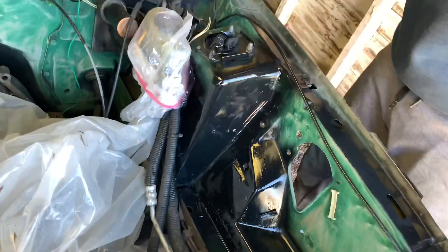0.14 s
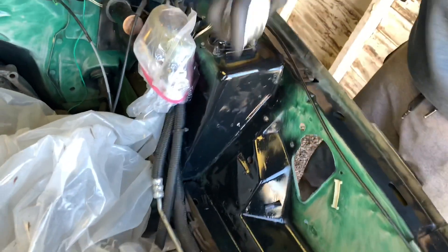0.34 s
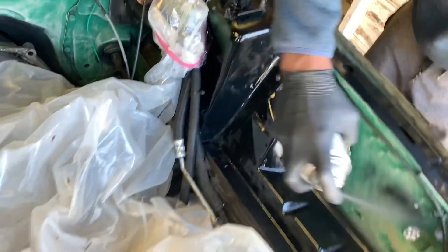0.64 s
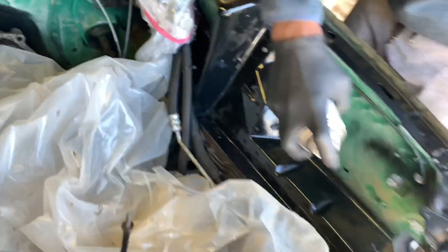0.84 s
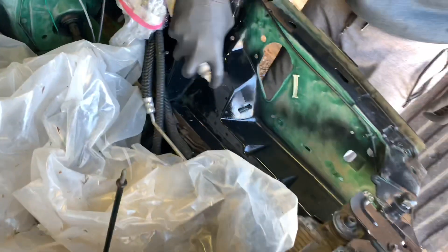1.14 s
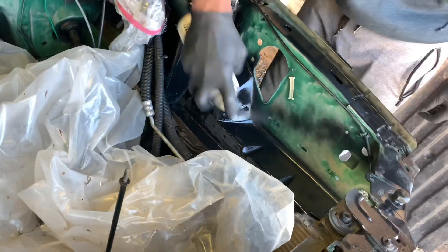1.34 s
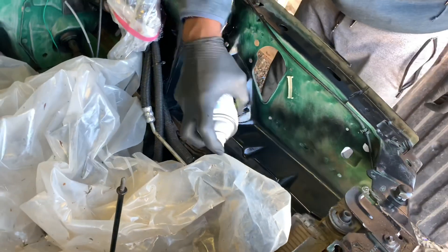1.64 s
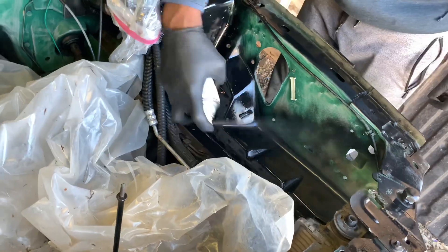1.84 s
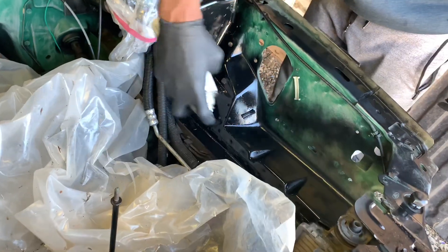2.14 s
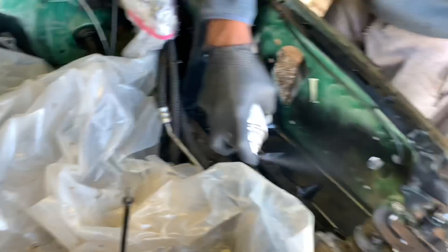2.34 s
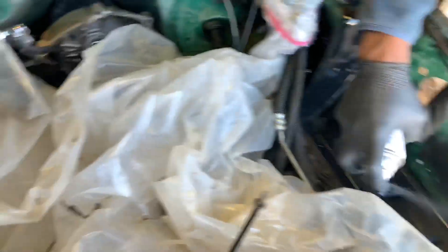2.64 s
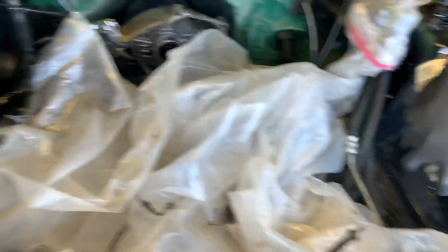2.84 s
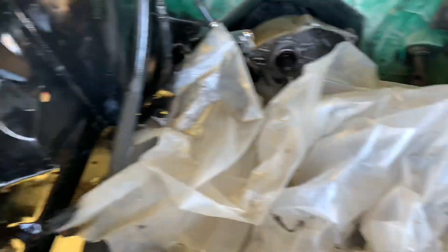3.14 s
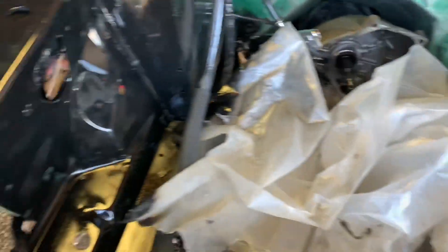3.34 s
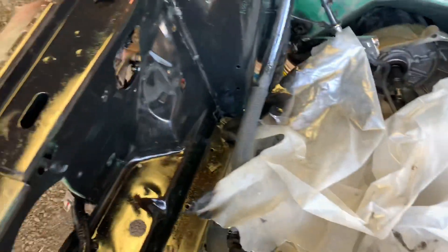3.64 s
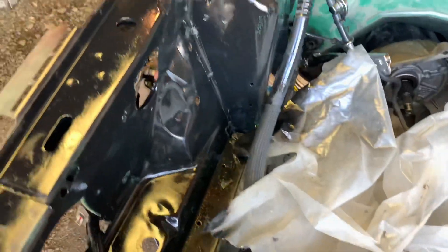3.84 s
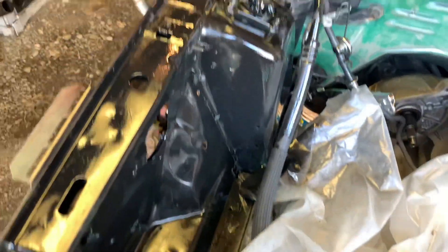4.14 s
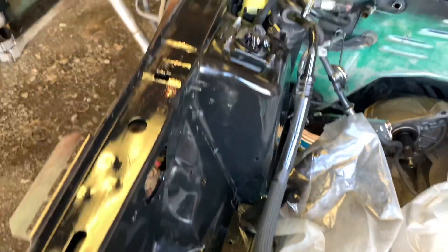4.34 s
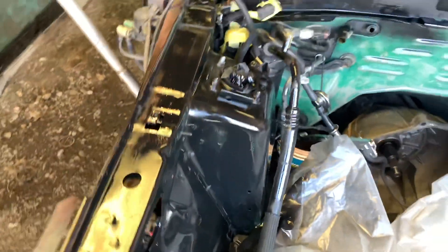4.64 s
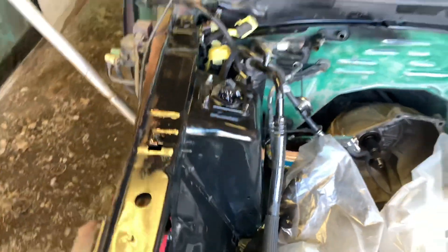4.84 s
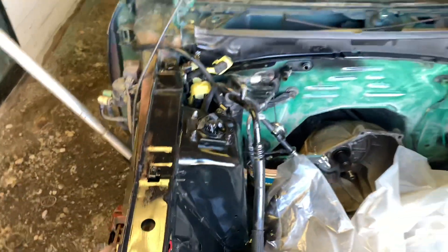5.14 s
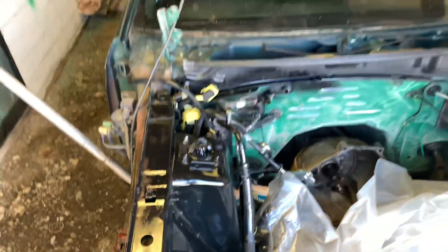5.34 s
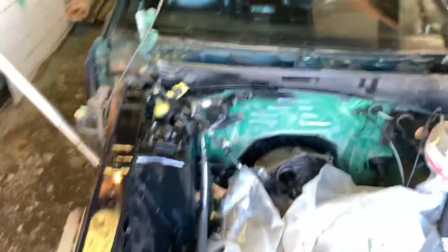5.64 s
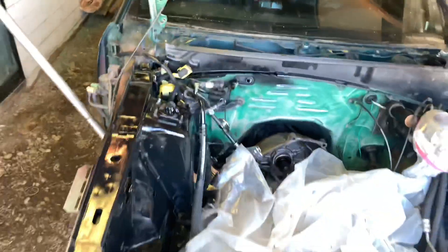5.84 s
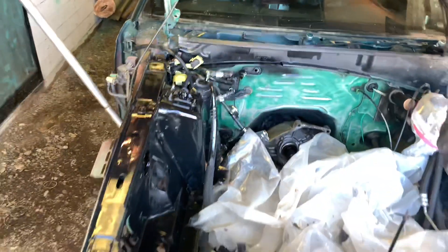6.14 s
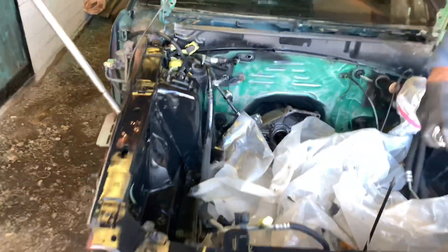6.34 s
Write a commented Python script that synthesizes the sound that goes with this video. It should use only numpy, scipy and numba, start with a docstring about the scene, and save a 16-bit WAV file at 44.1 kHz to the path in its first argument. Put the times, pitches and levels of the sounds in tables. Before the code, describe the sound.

A paint can's ball clatters and a glove rustles, then crisp airy sprays follow one another, each a quarter second long and abruptly shut off. Hard clicks in the can and muffled sheet-metal knocks fall around them. Many presses begin with a tiny squeak and spit; the final one is cut off. A faint low motor and rumble lie beneath, picked up closely by a moving phone in a garage.

```python
"""From the dying tail of one press on, a spray can fires short presses over sheet metal in a garage.
Rattles and a rustle come first; from 0.5 s noise jets hiss, a wide plume around them; knocks cluster near 1 s.
From 1.3 s most presses start with a rising noise squeak, many with a spit; late on, rustle; the last press is cut.
Mixing ball and bodywork are rough noise contacts ringing band-pass modes; noise tails make the room.
Throughout, a wavering motor sine and rumble lie below; a hand-held phone swings past, so the side lag drifts."""
import sys
import numpy as np
from scipy import signal
from scipy.fft import rfft, irfft
from scipy.io import wavfile
from scipy.ndimage import uniform_filter1d, map_coordinates
from numba import njit

SR = 44100
rng = np.random.default_rng(int(sys.argv[2]) if len(sys.argv) > 2 else 0)


def waveform_to_disk(signal):
    """Save audio, clipped to [-1, 1], as 16-bit WAV at the path in sys.argv[1]."""
    frames = np.transpose(np.atleast_2d(signal))
    scaled = np.clip(frames, -1, 1) * 32767
    samples = np.round(scaled).astype(np.int16)
    wavfile.write(sys.argv[1], SR, samples)


N = 286375
TIME_S = np.arange(N) / SR

# presses: open_s, length_s, jet_db, first_rush_over_jet_db, sag_over_press_db, lower_hiss_over_jet_db,
# shut_db_per_s, crack_lead_s, squeak_db, spit_peak_db; None = no such sound
PRESSES = [(-.2, 0.2, -49, -4, -0.5, -4, 400, None, None, None),
           (0.524, 0.21, -39, 6, 1, -12, 750, None, None, None),
           (0.852, 0.26, -42, 9.5, -5, -10.5, 650, None, None, None),
           (1.276, 0.27, -34, -5, 6, -13, 790, 0.023, -42, None),
           (1.677, 0.29, -36.5, 2.4, 4.5, -13.5, 750, None, None, None),
           (2.138, 0.27, -39.5, 5, -2, -14, 800, 0.047, -40, -45.5),
           (2.596, 0.28, -38, 6, 5, -14, 748, 0.045, -35, -41),
           (3.043, 0.34, -40, 2, 3, -13, 600, 0.036, -37.5, -44),
           (3.695, 0.34, -44.5, 7, -1.5, -14, 597, 0.046, -47, -48.5),
           (4.293, 0.24, -42, 1, 4.5, -14, 650, 0.045, -45.5, -57.5),
           (4.647, 0.21, -44, 2, -2, -12.5, 549, 0.051, -58, None),
           (5.032, 0.29, -43.5, -1.5, 6.5, -9.5, 494, None, None, None),
           (5.509, 0.26, -44.5, 6.5, -3.5, -14, 392, 0.043, -42, -47),
           (6.008, 0.22, -37, -16, 3.5, -12.5, 448, .029, -38, -42),
           (6.438, 0.079, -45.5, -11, -7, -10, 600, 0.022, -46, -46.5)]
# jet hiss spectrum: freq_hz, density_db
JET_SPECTRUM = [(4500, -34), (6500, -6.5), (8500, -5), (10500, 0), (13000, 1), (16000, -9)]
# lower hiss spectrum: freq_hz, density_db
LOWER_SPECTRUM = [(500, 2), (1000, -4.5), (2100, 2), (2600, 6.5), (3100, 1), (4500, 6), (6500, 1),
                  (9000, -39)]
# mixing ball blows on the can wall: time_s, base_level_db, dull_modes_over_base_db, bright_modes_over_base_db
BALL_BLOWS = [(0.086, -52, 3, -12), (0.1973, -21.5, -10.5, -29), (0.2741, -42.5, 2.5, 2),
              (0.328, -45, 3, 0), (0.3606, -46.5, -1.5, 0), (0.379, -50, 1, -1), (0.391, -57, 3, -4),
              (0.7722, -30, -7.5, 7.5), (1.5503, -33.5, -8, 10.5), (1.614, -53, 7, 14.5),
              (1.6364, -40.5, -10, 7), (1.7928, -39, -8.5, -17), (2.088, -42.5, -49, -27),
              (2.2203, -31, -14.5, -13), (3.1027, -25.5, -47, -20), (3.192, -36, -30, -22),
              (3.4367, -36.5, -8.5, 8.5), (3.4882, -35.5, -41, 4), (3.548, -44, -6, -1),
              (4.9485, -43.5, -8, 7.5), (5.8714, -47.5, -30, -1), (5.959, -53, -17, 2), (6.288, -50, -2, 3)]
# can wall modes: centre_hz, width_hz, level_db
CAN_MODES = [(1090, 570, -5), (1680, 820, 7), (2610, 650, -1.5), (3850, 540, 0), (6700, 2600, 2),
             (11050, 11300, 2)]
# knocks on the bodywork: time_s, base_level_db, deep_modes_over_base_db, contact_s
KNOCKS = [(0.945, -40.5, -15, 0.011), (0.959, -41.5, 1, 0.0074), (0.979, -41.5, -2.5, 0.0062),
          (0.994, -43, -4, 0.011), (1.028, -32.5, -26, 0.011), (1.042, -28.5, -9, 0.0054),
          (1.066, -42, -19, 0.018), (1.105, -36.5, -3, 0.0064), (1.1152, -25, -14, 0.0011),
          (1.134, -42, -10, 0.023), (1.198, -47, -17, 0.0066), (1.223, -42.5, -10, .008),
          (1.24, -40, -12, 0.0063), (4.399, -42.5, -11.5, 0.0042), (4.841, -38, -8, 0.0064),
          (5.522, -45.5, -5, 0.0082), (6.109, -35.5, -14, .003), (6.179, -37.5, -6.5, 0.0029)]
# bodywork panel modes: centre_hz, width_hz, level_db
PANEL_MODES = [(198, 290, 6), (375, 203, -2), (646, 490, 8), (935, 210, -5.5), (1290, 220, 1.5),
               (1543, 116, -5), (1900, 490, -18)]
# glove and plastic sheet stirs: loudest_s, level_db, fade_db_per_s
STIRS = [(0, -52, 181), (.15, -61.5, 32), (1.03, -53.5, 110), (4.999, -58, 195), (5.642, -58, 189),
         (5.84, -65.5, 204), (6.141, -46.5, 179)]
# folding sheet spectrum: freq_hz, density_db
SHEET_SPECTRUM = [(400, 1), (900, -2.5), (1600, 4), (4000, -5), (16000, -13.5)]
# distant motor level: time_s, peak_db before waver
MOTOR_LEVEL = [(0.0, -43), (0.9, -37), (1.35, -48.5), (1.75, -46.5), (2.0, -56), (2.5, -50), (3.4, -60.5),
               (3.75, -49), (4.7, -57.5), (6.05, -72.5), (6.378, -39.5), (6.49, -53)]
# garage rumble level: time_s, level_db before waver
RUMBLE_LEVEL = [(0, -54.5), (1.2, -53), (2.7, -55), (4.2, -56.5), (5.6, -55), (6.3, -51.5)]
# garage rumble spectrum: freq_hz, density_db
RUMBLE_SPECTRUM = [(28, -50), (42, 2), (120, -1), (200, -6.5), (400, -15.5), (700, -30), (1900, -39),
                   (4000, -43.5), (16000, -55)]
# low puffs, probably air on the moving phone: centre_s, level_db, half_length_s
GUSTS = [(0.634, -50, 0.044), (2.803, -52, 0.078), (3.89, -57, 0.14), (5.523, -51, 0.014)]
# can bearing as the phone turns: time_s, left_lags_right_ms
BEARING = [(.6, 0.1), (1.1, -0.052), (2.3, -0.0245), (2.75, 0.2), (3.2, 0.35), (3.8, 0.37), (4.7, 0.349),
           (5.6, 0.26), (6.49, 0.2)]

OPEN_DB_PER_S = 1377
LOWER_RUSH_DB, RUSH_S = 4., 0.017  # extra lower hiss in the first rush; settling time of the rush
EASE_DB, EASE_S = 8.5, 0.011  # finger eases off before it lets go
SPIT_SHARE = 0.54  # spit precedes full flow by this share of the crack lead
TICK_GAIN, TICK_AT_DB, TICK_DB_PER_DB = 3.8, -46, 0.37  # by base level less bright part: hard, square blows tick more
RUSTLE_RISE_DB_PER_S, CRACKLE_AT_DB = 172, -56  # stirs above the latter crackle more than they rustle
MOTOR_HZ, MOTOR_SAG_HZ_PER_S = 78.8, .8
ROOM_T60_S, BRIGHT_T60_S, ROOM_DB = .24, .14, -5
PORTS_MS, PORTS_HZ, TREBLE_SHARED = .297, 8800, .82  # left lag; where sharing sets in; share up there
TOP_HZ = 16100


def spray(spread=0.64):
    """Turbulent nozzle jet plus a stem-coloured lower hiss; returns nozzle and two-sided plume on the metal."""
    jet, lower, sputter = np.zeros((3, N))
    for open_s, length_s, jet_db, rush_db, sag_db, lower_db, shut_db_per_s, *_ in PRESSES:
        close_s = open_s + length_s
        since_s = np.maximum(TIME_S - open_s, 0)
        left_s = np.maximum(close_s - TIME_S, 0)
        opening_db = -OPEN_DB_PER_S * np.maximum(open_s - TIME_S, 0)
        closing_db = -shut_db_per_s * np.maximum(TIME_S - close_s, 0)
        rush = np.exp(-since_s / RUSH_S)
        ease = np.exp(-left_s / EASE_S)
        sag = np.minimum(since_s / length_s, 1)
        flow_db = jet_db - sag_db * sag + rush_db * rush + opening_db + closing_db
        jet += undb(flow_db - EASE_DB * ease)
        lower += undb(flow_db + lower_db + LOWER_RUSH_DB * rush)
        sputter += np.exp(-since_s / 0.04) * (TIME_S > open_s)
    # droplets leave unevenly, most so just after opening
    flutter = undb(1.83 * walk(60) + (.8 + sputter) * walk(2500))
    swings_db = [3.2 * walk(11) for _ in range(6)]
    hisses = []
    for _ in range(3):  # nozzle, plume left, plume right
        jet_hiss = jet * flutter * coloured(JET_SPECTRUM, 8100, 14600)
        lower_hiss = lower * flutter * patchy(coloured(LOWER_SPECTRUM, 1000, 9100), swings_db)
        hisses.append(jet_hiss + lower_hiss)
    return hisses[0], spread * np.array(hisses[1:])


def patchy(hiss, swings_db):
    """Bands of the hiss swell and fade independently as the spray cone wanders."""
    centres_hz = 1800 * 1.35 ** np.arange(len(swings_db))
    return hiss + sum((undb(db) - 1) * band(hiss, hz, hz / 4) for hz, db in zip(centres_hz, swings_db))


def valve():
    """Gas squeaks upward through the widening gap and leaks on; then a spit rings the stem."""
    out = np.zeros(N)
    t_s = np.arange(int(.04 * SR)) / SR
    squeak_hz = 8000 + 170000 * np.minimum(t_s, .016)
    rise, fade = np.minimum(t_s / 0.016, 1), np.exp(-(t_s / .016) ** 4)
    for open_s, *_, lead_s, squeak_db, spit_db in PRESSES:
        gas = rng.standard_normal(len(t_s))
        spit = burst(0.05, 0.00045, 0.0097)
        if squeak_db is not None:
            squeak = sum(svf(svf(gas, k * squeak_hz, 2400.), k * squeak_hz, 2400.) for k in (1, 1.4))
            leak = 0.5 * band(gas, 11400, 9600) * t_s / t_s[-1]
            add(out, open_s - lead_s, undb(squeak_db) * (squeak * fade + leak) * rise)
        if spit_db is not None:
            stem = band(band(spit, 3140, 1100), 2640, 1400)
            add(out, open_s - SPIT_SHARE * lead_s, peak(stem, spit_db))
    return out


def ball():
    """A tick and a skid of a few ms along the wall ring the can's damped modes."""
    out = np.zeros(N)
    for time_s, base_db, dull_db, bright_db in BALL_BLOWS:
        contact = burst(0.026, 0.0021, 0.0041) + 0.035 * burst(0.14, 0.0034)
        contact[40] += TICK_GAIN * undb(TICK_DB_PER_DB * (base_db - bright_db - TICK_AT_DB))
        # grip and paint level move the modes from blow to blow
        shifts = 1 + .05 * rng.standard_normal(len(CAN_MODES))
        for (hz, width_hz, mode_db), shift in zip(CAN_MODES, shifts):
            part_db = dull_db if hz < 2000 else bright_db if hz > 7000 else 0
            mode = ring(contact, hz * shift, width_hz)
            add(out, time_s - .001, peak(mode, base_db + mode_db + part_db))  # tick is 0.9 ms in
    return out


def knocks():
    """A rough, stuttering contact rings the panel; where it lands sets the share of each mode."""
    out = np.zeros(N)
    for time_s, base_db, deep_db, contact_s in KNOCKS:
        blow = burst(0.018 + 3 * contact_s, contact_s / 5, contact_s / 2)
        blow *= undb(4 * np.repeat(rng.standard_normal(len(blow) // 45), 45))  # stutters about every ms
        places_db = 1.5 * rng.standard_normal(len(PANEL_MODES))
        panel = np.zeros(len(blow))
        for (hz, width_hz, mode_db), place_db in zip(PANEL_MODES, places_db):
            part_db = deep_db * (hz < 900)
            panel += peak(ring(blow, hz, width_hz), mode_db + place_db + part_db)
        add(out, time_s, undb(base_db) * panel)
    return out


def rustle():
    """Folding-sheet noise: each stir swells quickly, fades at its own pace; hard ones crackle brightly."""
    gain = np.zeros(N)
    for loudest_s, level_db, fade_db_per_s in STIRS:
        rise_db = -RUSTLE_RISE_DB_PER_S * np.maximum(loudest_s - TIME_S, 0)
        fade_db = -fade_db_per_s * np.maximum(TIME_S - loudest_s, 0)
        gain += undb(level_db + rise_db + fade_db)
    hardness = gain / undb(CRACKLE_AT_DB)
    crackle = hardness * undb(6.3 * walk(700)) * band(rng.standard_normal(N), 3800, 2600)
    return gain * undb(3.3 * walk(150)) * (coloured(SHEET_SPECTRUM, 900, 3000) + crackle)


def garage_air():
    """A wavering, slowly sagging motor sine, noise rumble and soft gusts; the bass is nearly alike on both sides."""
    motor_hz = (MOTOR_HZ - MOTOR_SAG_HZ_PER_S * TIME_S) * (1 + .015 * walk(10))
    turns = np.cumsum(motor_hz) / SR
    motor_db = follow(MOTOR_LEVEL) + 1.04 * walk(9.9)
    motor = undb(motor_db) * np.sin(2 * np.pi * turns)

    mid, side = coloured(RUMBLE_SPECTRUM, 105.8, 274), coloured(RUMBLE_SPECTRUM, 116, 165)
    highpass = signal.butter(1, 900, "high", fs=SR, output="sos")
    side = 0.1 * side + 0.59 * signal.sosfilt(highpass, side)
    sides = np.array([[1], [-1]])  # left, right
    rumble = undb(follow(RUMBLE_LEVEL) + 1.8 * walk(9)) * (mid + sides * side)

    gust_spectrum = [(120, -55.0), (200, -12.0), (450, -14.0), (900, -36.0)]  # freq_hz, density_db
    gust_mid, gust_side = (coloured(gust_spectrum) for _ in range(2))
    swell = sum(undb(db) * np.exp(-((TIME_S - centre_s) / half_s) ** 2) for centre_s, db, half_s in GUSTS)
    gusts = swell * undb(2.5 * walk(30)) * (gust_mid + .4 * sides * gust_side)
    return (motor + rumble) * (1 - 0.046 * sides) + gusts


def room(dry):
    """Decaying noise tails, another for each side, duller as they fade."""
    t_s = np.arange(int(.4 * SR)) / SR
    tails = rng.standard_normal((2, len(t_s))) * undb(-60 * t_s / ROOM_T60_S) * (t_s > .002)
    bright = np.array([band(noise, 1950, 8600) for noise in rng.standard_normal((2, len(t_s)))])
    tails += 11.2 * bright * undb(-60 * t_s / BRIGHT_T60_S)
    tails *= undb(ROOM_DB) / np.sqrt(np.sum(tails[0] ** 2))
    return signal.fftconvolve(dry[None], tails)[:, :N]


def undb(db):
    """dB to gain."""
    return 10 ** (np.asarray(db) / 20)


def follow(table):
    """Interpolates a time_s, value table over the scene."""
    return np.interp(TIME_S, *np.transpose(table))


def coloured(spectrum, lo_hz=20, hi_hz=20000):
    """Gaussian noise with the given spectrum, rms 1 between lo_hz and hi_hz."""
    hz = np.maximum(np.fft.rfftfreq(N, 1 / SR), 1)
    at_hz, db = np.transpose(spectrum)
    above_db = db[-1] - 40 * (at_hz[-1] < 15000)
    shape_db = np.interp(np.log(hz), np.log(at_hz), db, -90, above_db)
    spec = rfft(rng.standard_normal(N)) * undb(shape_db)
    inside = (hz > lo_hz) & (hz < hi_hz)
    return irfft(spec, N) * N / np.sqrt(2 * np.sum(np.abs(spec[inside]) ** 2))


@njit
def svf(x, hz, width_hz):
    """State-variable band-pass with a moving centre, gain 1 there."""
    y, b, l = np.empty(len(x)), 0., 0.  # b, l: band and low integrator states
    for i in range(len(x)):
        g, k = np.tan(np.pi * hz[i] / SR), width_hz / hz[i]
        v = (b + g * (x[i] - l)) / (1 + g * (g + k))
        b, l, y[i] = 2 * v - b, l + 2 * g * v, k * v
    return y


def band(x, hz, width_hz):
    """Band-pass with a fixed centre."""
    return svf(x, np.full(len(x), 1. * hz), 1. * width_hz)


def ring(blow, hz, width_hz):
    """Damped mode: two band-passes in series, the second twice as wide."""
    return band(band(blow, hz, width_hz), hz, 2 * width_hz)


def walk(rate_hz):
    """Random levels at rate_hz joined by ramps; spread a little under 1."""
    k = int(SR / rate_hz)
    return uniform_filter1d(np.repeat(rng.standard_normal(N // k + 1), k), k)[:N]


def burst(t60_s, rise_s, hold_s=0.):
    """Noise that rises and dies away after hold_s, as from a rough contact."""
    t_s = np.arange(int(.15 * SR)) / SR
    shape = np.minimum(t_s / rise_s, 1) * undb(-60 * np.maximum(t_s - hold_s, 0) / t60_s)
    return shape * rng.standard_normal(len(t_s))


def peak(sound, db):
    """Scales a short sound to its peak level."""
    return undb(db) * sound / np.abs(sound).max()


def add(track, time_s, sound):
    """Mixes a short sound in at time_s."""
    i = int(time_s * SR)
    track[i:i + len(sound)] += sound[:len(track) - i]


def scene():
    """Can and knocks reach both sides with a small drifting lag; plume, room and garage air are wide."""
    nozzle, plume = spray()
    # the metal throws the hiss back over a path that changes as the hand sweeps
    bounce_s = 0.000906 + 0.000339 * uniform_filter1d(walk(4), size=8000)
    nozzle = nozzle + 0.34 * map_coordinates(nozzle, [np.arange(N) - bounce_s * SR], order=3)
    blows = knocks() + ball()
    near = nozzle + valve() + blows + rustle()
    lag_samples = follow(BEARING) * SR / 1000
    left = map_coordinates(near, [np.arange(N) - lag_samples], order=3)
    # the blows come from close by, so the walls answer them less
    return np.array([left, near]) + plume + room(near - 0.45 * blows) + garage_air()


def record(dry):
    """The phone keeps two sides in the low range; its treble is mostly shared, a fixed lag later on the left."""
    hz = np.fft.rfftfreq(N, 1 / SR)
    left, right = rfft(dry)
    share = TREBLE_SHARED / (1 + np.exp((PORTS_HZ - hz) / 250))
    late_right = right * np.exp(-2j * np.pi * hz * PORTS_MS / 1000)
    left = np.sqrt(1 - share ** 2) * left + share * late_right
    lowpass = signal.ellip(10, .2, 80, TOP_HZ, fs=SR, output="sos")
    return signal.sosfilt(lowpass, irfft(np.array([left, right]), N))


dry = scene()
out = record(dry)
waveform_to_disk(out)
```